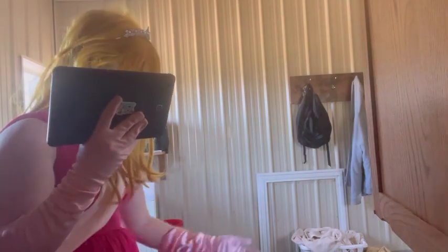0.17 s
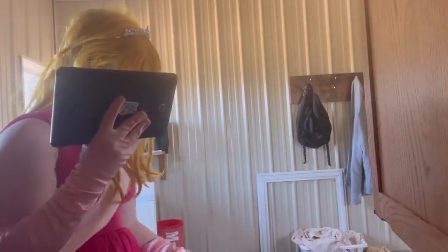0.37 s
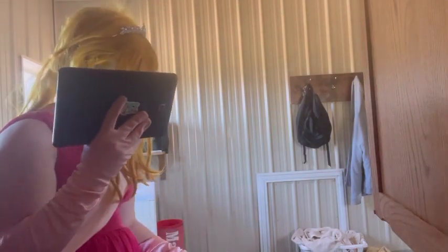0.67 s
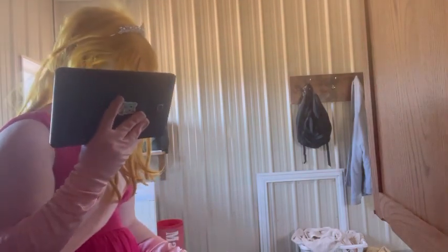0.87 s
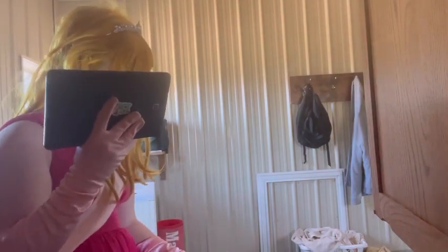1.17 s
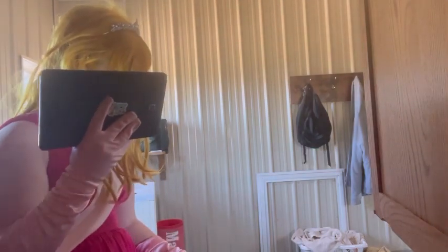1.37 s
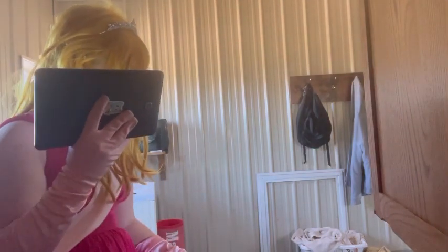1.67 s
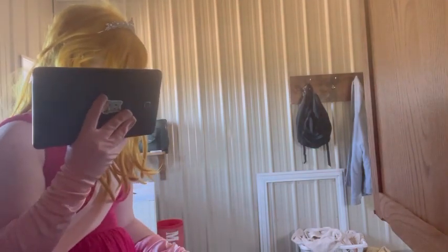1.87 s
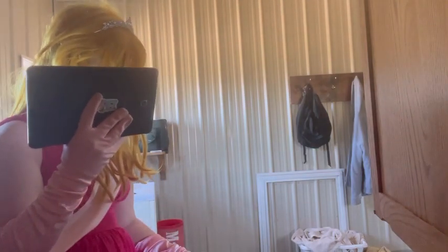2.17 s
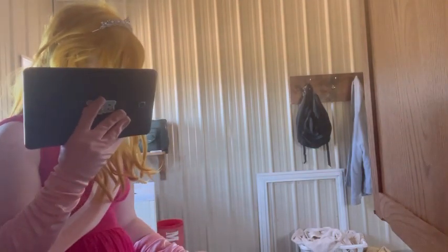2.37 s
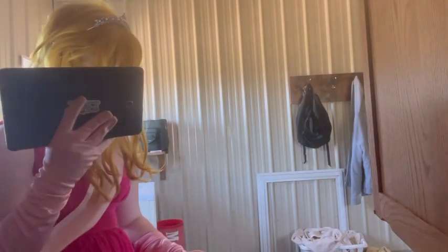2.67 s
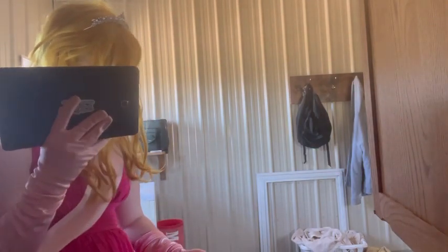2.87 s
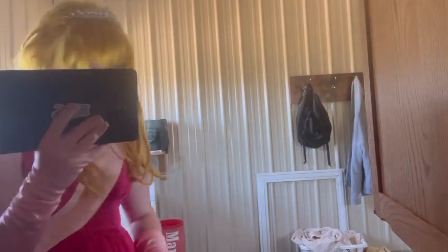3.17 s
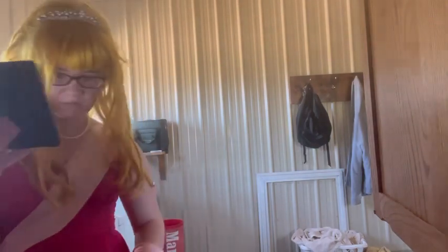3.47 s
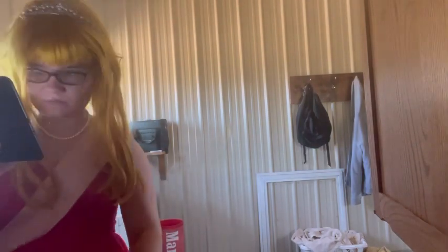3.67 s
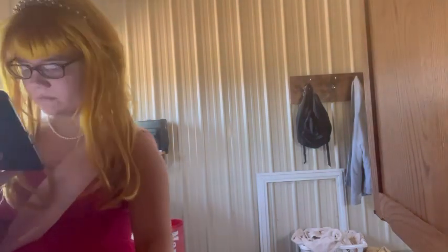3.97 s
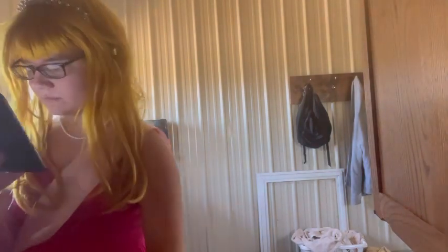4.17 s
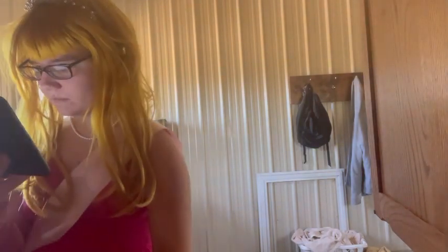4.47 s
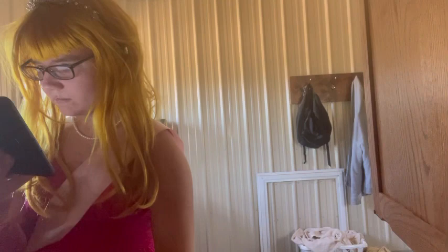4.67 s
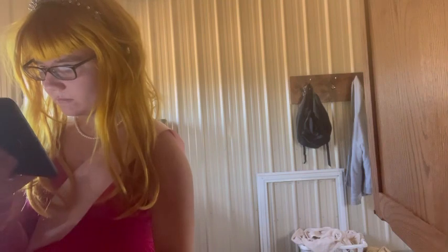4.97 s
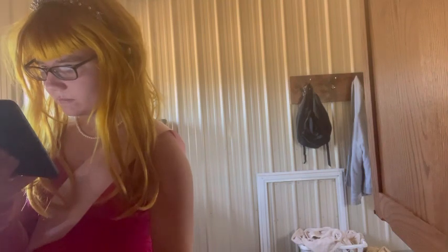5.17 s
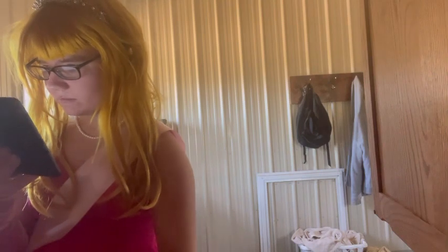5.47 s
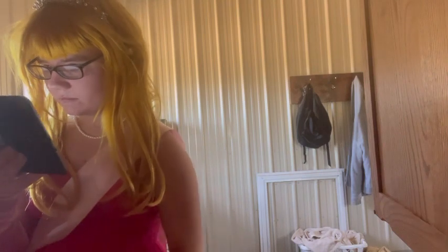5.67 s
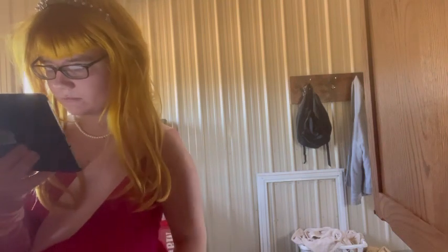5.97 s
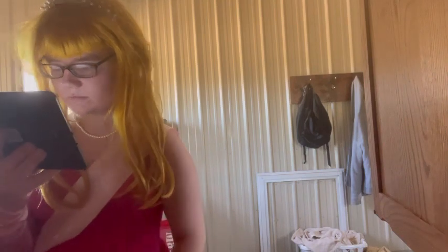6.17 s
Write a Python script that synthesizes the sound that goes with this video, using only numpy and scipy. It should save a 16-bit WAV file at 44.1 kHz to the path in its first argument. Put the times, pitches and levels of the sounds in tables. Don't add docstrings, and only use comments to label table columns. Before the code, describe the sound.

A quiet, bare metal-walled room hums with low rumble and faint microphone hiss. At 0.24 seconds a hollow air-filled ball hits the hard floor: a loud, ringing thump with a pitched hollow tone around 1 kHz and a reverberant tail. Another strong bounce comes at 0.9, then a slappier one at 1.5 that sets loose metal gear knocking and rattling for about 0.2 seconds. Softer bounces follow near 1.85, 2.2, 2.5, 2.9, 3.2 and 3.5, moving farther off. A low door thud booms at 2.6. Barely audible cloth brushes pass around 1.8 to 3.8. From 3.75 the hops shrink and quicken into a fading patter until about 6. Soft far footfalls fall near 2.4, 3.9 and 4.2, with a firmer cluster around 5. An almost inaudible high insect tone wavers at 0.9, 4.25, 4.9 and 5.7.

```python
import sys
import numpy as np
from scipy import signal
from scipy.fft import rfft, irfft, next_fast_len
from scipy.io import wavfile
from scipy.ndimage import map_coordinates

SR = 44100
rng = np.random.default_rng(int(sys.argv[2]) if len(sys.argv) > 2 else 0)


def ratio(d):
    e = np.asarray(d, float) / 20
    return 10 ** e


def to_wav(s):
    ch = np.atleast_2d(s).T
    pcm = np.round(np.clip(ch, -1, 1) * 32767)
    wavfile.write(sys.argv[1], SR, pcm.astype(np.int16))


N = 278182
TAIL_SAMPLES = 22000

# start in seconds, air
# ring peak in dB, skin slap and free ring in dB re air ring.
LANDINGS = [(0.238, -27.5, -7, 3.5), (0.921, -29, -7, -4), (1.515, -33.5, 1, 0), (1.856, -34.5, -7, 0.5),
            (2.204, -40.5, -0.5, -20), (2.22, -36, -10.5, 1.5), (2.523, -34.5, -13.5, -2),
            (2.881, -33, -11.5, -5), (3.197, -35, -12, -1.5), (3.481, -36, -14, -6.5), (3.873, -46, 3, -16)]
# centre in Hz, width in Hz, level in dB.
BALL_AIR_MODES = [(729, 52, -8.5), (878, 24, -1), (921, 39, 0.5), (1042, 16.9, 4), (1088, 14, -4.5),
                  (1136.7, 50, 0.5), (1180, 18, -4), (1217, 65, -0.5), (1352, 30, -8), (1431, 70, -5.5),
                  (2016, 260, -20)]
# frequency in Hz, level in dB, t60 in seconds.
FLIGHT_MODES = [(867, -11.5, 0.21), (969, -14, 0.71), (1016.6, -1, 0.79), (1041, -9.5, 0.94),
                (1112, -6, 0.41), (1151, -0.5, 0.87), (1180, -3, 0.62)]
# frequency in Hz, level in dB.
SLAP_SPECTRUM = [(820, -52), (1400, -10), (2270, -10), (3870, -16.5), (5180, -21.5), (6460, -20.5),
                 (7980, -30), (10200, -30), (15500, -33)]
SEAM_SLAP_DB = {9: 11.2, 11: 13, 13: 3.6}
# centre in Hz, width in Hz, level in dB.
THUMP_MODES = [(99, 24, -0.5), (138, 28, -6.5), (201.5, 21, 2), (277, 35, -1), (333.3, 25, -4.5),
               (399, 94, -9.5), (539, 24, -8), (639, 61, -9.5)]
# frequency in Hz, level in dB, t60 in seconds.
BOARD_MODES = [(124, -2.5, 0.13), (195.2, 0, .32), (216.3, -4.5, 0.13), (261.3, 3, 0.17), (347, -12, 0.28),
               (426, -12.5, .25)]
# time in seconds, level in dB.
RATTLE_LEVEL = [
    (1.505, -63),
    (1.52, -56),
    (1.54, -37),
    (1.58, -52),
    (1.62, -49),
    (1.66, -48),
    (1.72, -71),
]
# start in seconds, level in dB.
GEAR_KNOCKS = [
    (1.5231, -14),
    (1.5361, -8),
    (1.553, -11.5),
    (1.568, -19),
    (1.585, -19),
    (1.607, -11),
    (1.634, -15.5),
]
# frequency in Hz, level in dB.
GEAR_SPECTRUM = [(88, -43), (150, -9.5), (388, -3.5), (471, -9), (966, -2), (1150, 1.5), (1800, 2),
                 (3100, -3.5), (3410, -6.5), (4060, -12), (7560, -25), (9920, -29), (15500, -46.5)]
# centre in Hz, width in Hz, level in dB (unused: all ring alike).
METAL_MODES = [(1160, 39, 0), (1718, 14, -1), (2251, 28, -2), (2620, 42, -4), (3075, 191, -4),
               (4040, 60, -10), (9540, 40, -22), (11060, 75, -28), (12700, 60, -26), (13400, 31, -42)]
# start in seconds, push in dB, pitch in Hz, t60 in seconds.
DOOR_PUSHES = [
    (2.6085, -19, 280, .03),
    (2.6148, -21, 230, .025),
    (2.6205, -8.5, 125, .04),
    (2.629, -19, 170, .03),
]
# frequency in Hz, level in dB.
DOOR_SPECTRUM = [(24, -59), (40, -20.5), (146, -8.5), (179, -16.5), (247, -1.5), (368, -26.5), (407, -12.5),
                 (461, -23.5), (548, -18), (973, -29.5), (1160, -27), (1310, -38), (1410, -30),
                 (4130, -37.5), (15500, -62.5)]
# frequency in Hz, level in dB, t60 in seconds.
DOOR_LEAF_MODES = [(151.5, 5.5, 0.62), (207, 5.5, 0.44), (257, -7, 0.63), (409, -12, 0.45)]
# start in seconds, level in dB.
FOOTFALLS = [
    (2.408, -54),
    (3.899, -55),
    (4.201, -54.5),
    (4.891, -47),
    (4.976, -47),
    (5.049, -59.5),
    (5.136, -46.5),
    (5.237, -56),
    (5.798, -59),
]
# peak in seconds, 20 dB rise and 20 dB fall in seconds, peak in dB.
CLOTH_STROKES = [
    (1.844, .015, 0.031, -76.5),
    (2.294, .04, .09, -86),
    (3.036, 0.2, 0.034, -83),
    (3.13, 0.0037, 0.18, -79),
    (3.248, 0.28, 0.24, -84),
    (3.474, 0.011, 0.12, -79),
    (3.506, 0.053, .125, -75.5),
    (3.774, 0.08, 0.39, -89.5),
]
# frequency in Hz, level in dB.
CLOTH_SPECTRUM = [(500, -69), (1500, 3.5), (4000, -2), (7000, -8), (10000, -12.5), (14000, -19),
                  (15500, -23)]
# peak in seconds, level in dB.
CHIRPS = [
    (.86, -92),
    (4.25, -90),
    (4.9, -92),
    (5.72, -93),
]
# frequency in Hz, level in dB.
ROOM_SPECTRUM = [(12, -40.5), (20, 0.5), (76, 3), (119, -5), (282, -18), (342, -19), (452, -28.5),
                 (519, -24.5), (581, -28.5), (3260, -47), (4550, -46), (4950, -49), (6360, -51.5),
                 (12100, -53.5), (15500, -72.5)]
# frequency in Hz, t60 in seconds.
HALL_T60 = [(100, 0.62), (260, 0.45), (700, 0.56), (1100, 0.63), (1840, 0.6), (4850, 0.63), (9000, 0.48),
            (13000, 0.32)]
# frequency in Hz, correlation from -1 to 1.
CHANNEL_LIKENESS = [(80, 0.93), (250, 0.34), (430, -.15), (600, .3), (900, -0.68), (1200, 0.25),
                    (1600, -0.051), (5000, 0.00039), (7600, -0.72), (9300, 0.076), (11000, 0.47),
                    (15000, 0.99)]
# frequency in Hz, left minus right in dB.
CHANNEL_TILT = [(60, -1), (150, -1.5), (250, -10.5), (400, -1.5), (800, -1), (3000, -0.5)]


def ball():
    out, spot = np.zeros((2, N)), echo(build_s=0.0021)
    t = np.arange(TAIL_SAMPLES) / SR
    moved = 0.56
    for s, db, slap_db, free_db in LANDINGS + settling():
        far = np.clip((s - 0.9) / 3, 0, 1)
        thump_db = -4.5 + 0.41 * (db + 27.5)
        upper_db = -5.5 + 3.5 * far
        rise_s = 0.00696 + 0.012 * far
        here = (spot + moved * echo(build_s=0.0029)) / np.hypot(1, moved)
        here = here * (1 - np.exp(-t / rise_s))
        modes = [(c, w, g + upper_db * (c > 1100)) for c, w, g in BALL_AIR_MODES]
        soft_hz = 9000 * ratio(0.9 * (db + 30))

        def blow(hz):
            air = ratio(-4.5 * far) * resonances(modes, hz)
            thump = ratio(thump_db - 2.5) * resonances(THUMP_MODES, hz)
            slap = ratio(slap_db - 0.5) * colour(SLAP_SPECTRUM)(hz)
            return (air + thump + slap) / (1 + 1j * hz / (1.17 * soft_hz)) ** 3

        flight = [(c, g + upper_db * (c > 1100), t60) for c, g, t60 in FLIGHT_MODES]
        sing = ringing(flight, rise_s, lasting=0.4 + 0.44 * far, side=0.7)
        floor = ringing(BOARD_MODES, 0.0074, lasting=0.84, side=0.4)
        sound = filtered(here, blow) + ratio(free_db - 3.5) * sing + ratio(thump_db + 1 - 17 * far) * floor
        add(out, s - 0.003 - 0.007 * far, ratio(db - 5) * sound)
    return out


def settling():
    start_s, first_s, least_s, kept, hops = 3.753, 0.246, 0.04, 0.919, 17
    flight_s = least_s + (first_s - least_s) * kept ** np.arange(hops)
    slower = np.log10(first_s / flight_s)
    seam_db = np.array([SEAM_SLAP_DB.get(k, 0) for k in range(hops)])
    landing_s = start_s + np.cumsum(flight_s) - flight_s
    ring_db = -35.5 - 23 * slower
    slap_db = -13.5 - 49.5 * slower + seam_db
    free_db = -8.5 + 10.5 * slower
    return list(zip(landing_s, ring_db, slap_db, free_db))


def clatter():
    spikes = unit(rng.standard_normal(N) * ratio(4.32 * rng.exponential(1, N)))
    clicks = level(RATTLE_LEVEL) * spikes
    for s, db in GEAR_KNOCKS:
        clicks[round(s * SR)] += ratio(db)
    tail = echo(build_s=0.0006)
    wet = signal.fftconvolve(clicks[None], tail / np.linalg.norm(tail[0]), axes=1)[:, :N]
    rings = [(c, w, 0) for c, w, db in METAL_MODES]

    def gear(hz):
        return colour(GEAR_SPECTRUM)(hz) * (1 + hz / 12000) * (1 + 0.025 * resonances(rings, hz))

    return ratio(9) * filtered(wet + 0.18 * clicks, gear)


def door():
    out, t = np.zeros((2, N)), np.arange(4410) / SR
    for k, (s, db, hz, t60) in enumerate(DOOR_PUSHES):
        push = ratio(db + 3 - 60 * t / t60) * np.sin(2 * np.pi * hz * t)
        push = push * (1 - np.exp(-t / 0.0008))
        add(out, s, [[0.85], [0.35]] * push * (1 if k else -1))
    boom = ratio(-17.5) * filtered(echo(build_s=0.018), colour(DOOR_SPECTRUM))
    leaf = ratio(-34.5) * ringing(DOOR_LEAF_MODES, 0.011, lasting=1.0, side=0.6)
    add(out, DOOR_PUSHES[0][0], boom + leaf)
    return out


def steps():
    out = np.zeros((2, N))
    for s, db in FOOTFALLS:
        boom = filtered(echo(build_s=0.0041), lambda hz: resonances(THUMP_MODES, hz) / (1 + 1j * hz / 900) ** 2)
        boards = ratio(1.5) * ringing(BOARD_MODES, 0.0074, lasting=0.63, side=0.4)
        add(out, s - 0.008, ratio(db - 8) * (boom + boards))
    return out


def rustle():
    grains = unit(rng.standard_normal((2, N)) * ratio(0.71 * wobble(140)))
    return ratio(13.5) * strokes(CLOTH_STROKES) * filtered(grains, colour(CLOTH_SPECTRUM))


def background():
    air = filtered(rng.standard_normal((2, N)), colour(ROOM_SPECTRUM))
    low = filtered(air, lambda hz: 1 / (1 + (hz / 400) ** 2))
    air = air + low * (unit(ratio(1.5 * wobble(5))) - 1)
    insect = filtered(rng.standard_normal((2, N)), lambda hz: unit(np.exp(-((hz - 4620) / 130) ** 2)))
    rise_s, fall_s = 0.23, 0.32
    chirps = strokes([(s, rise_s, fall_s, db) for s, db in CHIRPS])
    return ratio(-56.5) * air + chirps * insect


def echo(build_s):
    hz, t, z = signal.stft(rng.standard_normal((2, TAIL_SAMPLES)), SR, nperseg=512)
    decay_db = -54 * t / along(HALL_T60, hz)[:, None] - 60 * t ** 2
    tail = signal.istft(z * ratio(decay_db), SR, nperseg=512)[1][:, :TAIL_SAMPLES]
    return tail * (1 - np.exp(-np.arange(TAIL_SAMPLES) / SR / build_s))


def resonances(modes, hz):
    total = 0
    for k, (c, w, db) in enumerate(modes):
        total = total + (-1) ** k * ratio(db) * 1j * hz * w / (c * c - hz * hz + 1j * hz * w)
    return unit(total)


def ringing(modes, rise_s, lasting, side):
    t = np.arange(TAIL_SAMPLES) / SR
    hz, db, t60 = np.transpose(modes)
    luck = rng.random((3, len(modes)))
    spin = np.exp(np.outer(2j * np.pi * hz - np.log(1000) / (t60 * lasting), t))
    start = ratio(db + 7.3 * luck[0]) * np.exp(2j * np.pi * luck[1:])
    return (start @ spin).imag * (1 - np.exp(-t / rise_s)) * [[1], [side]]


def strokes(rows):
    t = np.arange(N) / SR
    return sum(ratio(db - 20 * np.maximum((s - t) / rise, (t - s) / fall)) for s, rise, fall, db in rows)


def level(rows):
    s, db = np.transpose(rows)
    return ratio(np.interp(np.arange(N) / SR, s, db, -160, -160))


def wobble(rate_hz):
    knots = rng.standard_normal(int(N * rate_hz / SR) + 4)
    return map_coordinates(knots, [np.arange(N) * rate_hz / SR])


def colour(points):
    def response(hz):
        bass_loss_db = 40 * np.log10(np.maximum(1, (points[0][0] - 100) / (hz + 1)))
        return unit(ratio(along(points, hz) - bass_loss_db))
    return response


def filtered(x, response):
    n = x.shape[-1]
    m = next_fast_len(n + 8192)
    return irfft(rfft(x, m) * response(np.fft.rfftfreq(m, 1 / SR)), m)[..., :n]


def along(points, hz):
    f, v = np.transpose(points)
    return np.interp(np.log(hz + 1), np.log(f + 1), v)


def unit(x):
    return x / np.sqrt(np.mean(np.abs(x) ** 2) + 1e-20)


def add(out, s, sound):
    part = out[:, round(s * SR):round(s * SR) + sound.shape[1]]
    part += sound[:, :part.shape[1]]


def scene():
    field = ball() + clatter() + door() + steps() + rustle() + background()

    def shares(hz):
        angle = np.arccos(np.clip(along(CHANNEL_LIKENESS, hz), -0.93, 0.93)) / 2
        return np.array([np.cos(angle), np.sin(angle)])

    mid, side = filtered(field, shares)
    ports = np.array([mid + side, mid - side])
    return filtered(ports, lambda hz: ratio(along(CHANNEL_TILT, hz) * np.array([[0.5], [-0.5]])))


def roll_off(x):
    return signal.sosfilt(signal.butter(12, 15710, fs=SR, output="sos"), x)


def record(dry):
    top_hz, bass_hz = 15700, 50
    mix = filtered(dry, lambda hz: (hz < top_hz) * hz ** 3 / (hz ** 3 + bass_hz ** 3))
    return roll_off(mix)


dry = scene()
out = record(dry)
to_wav(out)
```